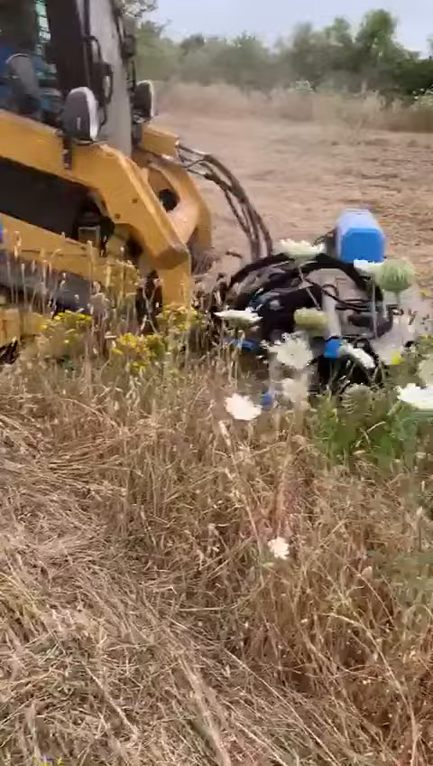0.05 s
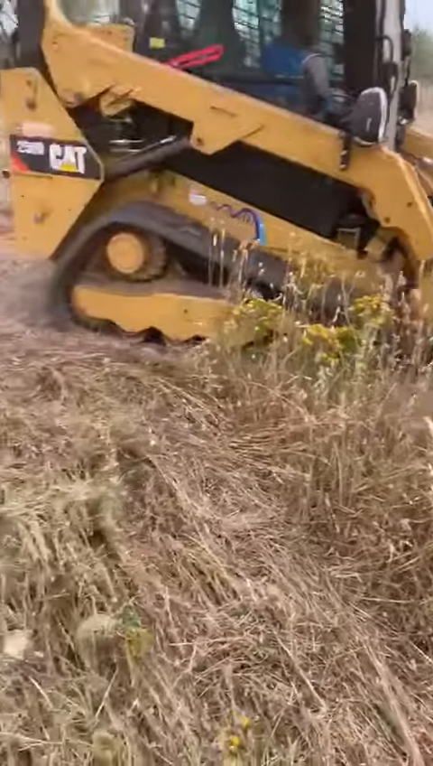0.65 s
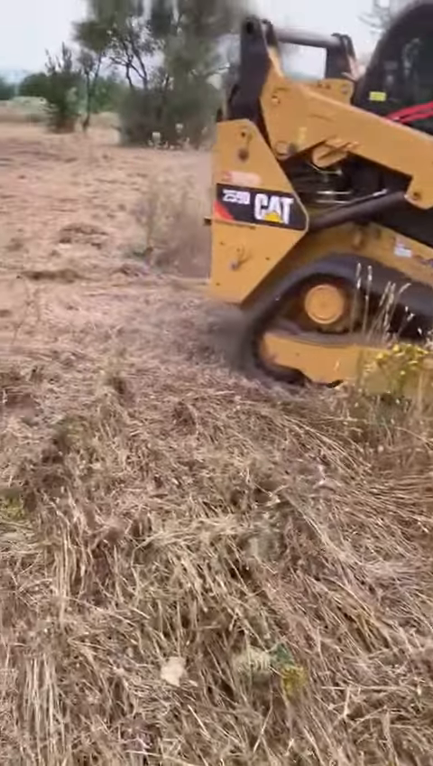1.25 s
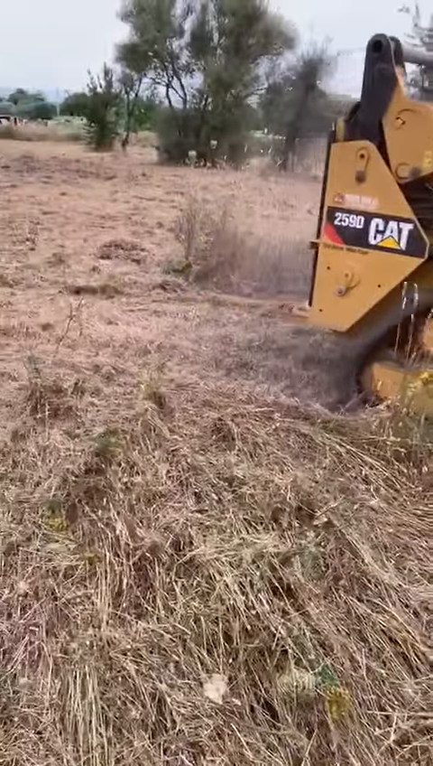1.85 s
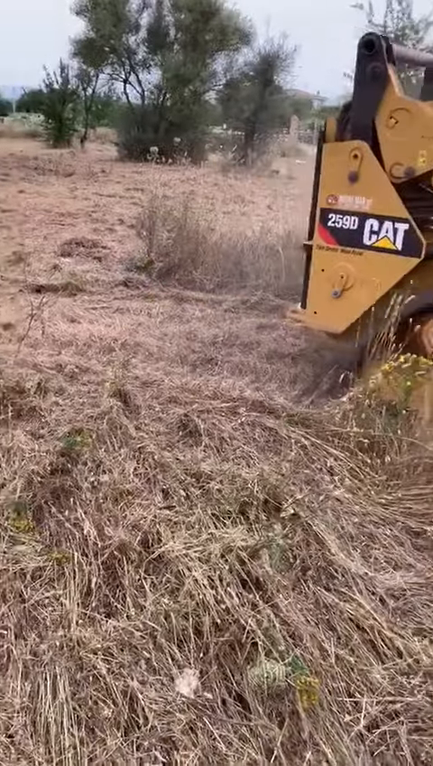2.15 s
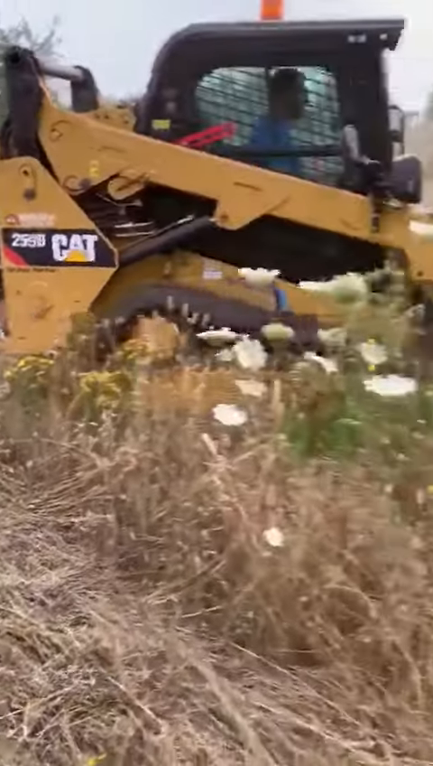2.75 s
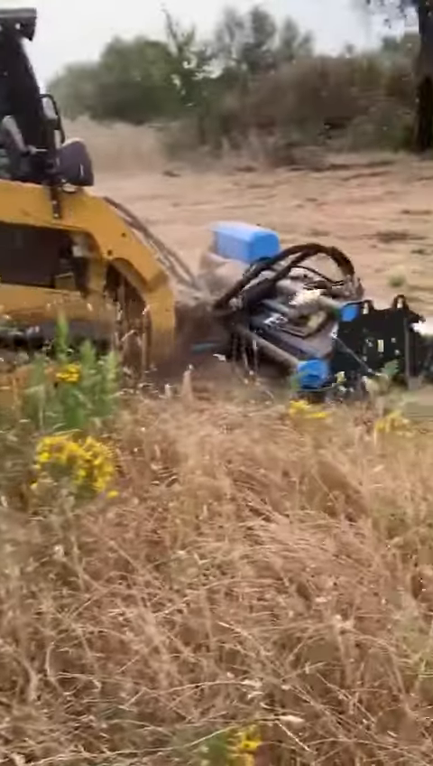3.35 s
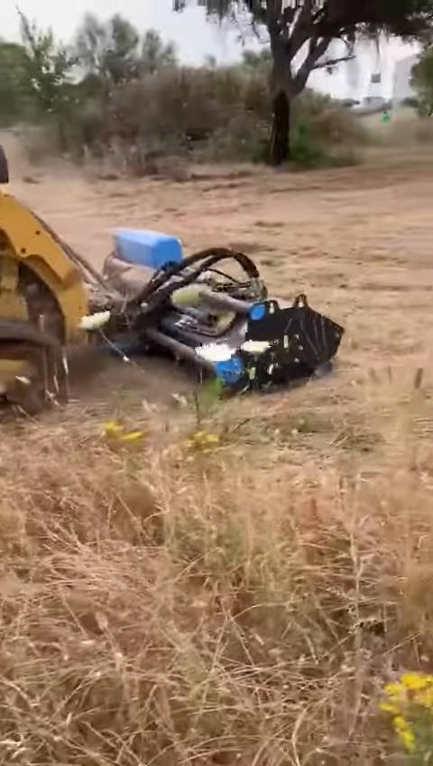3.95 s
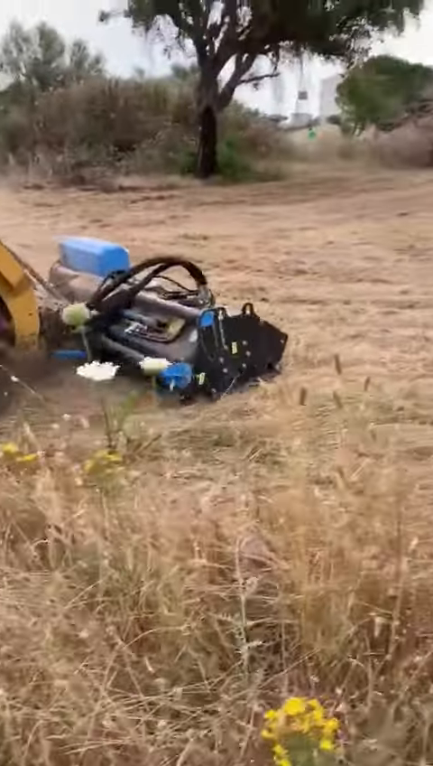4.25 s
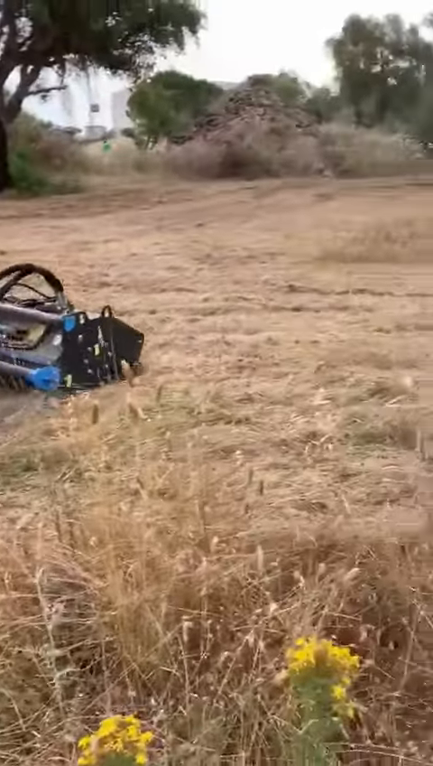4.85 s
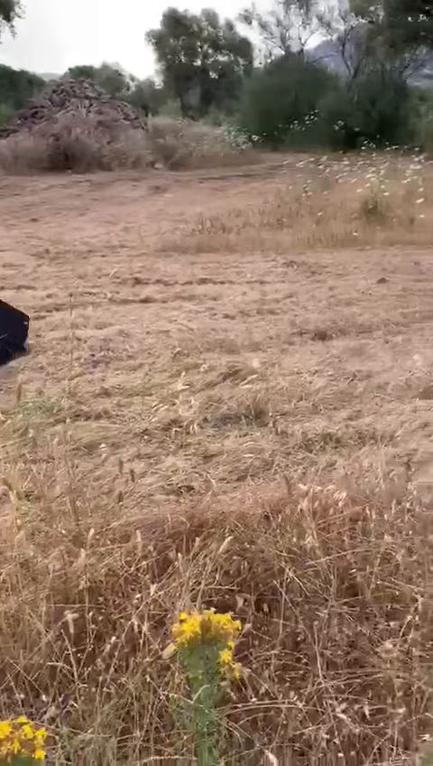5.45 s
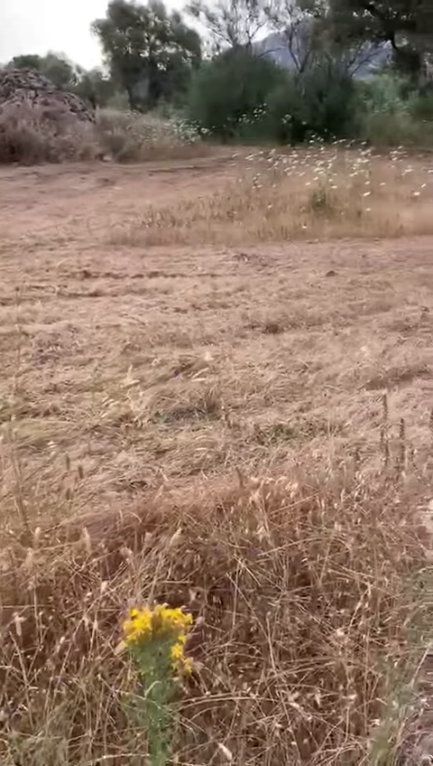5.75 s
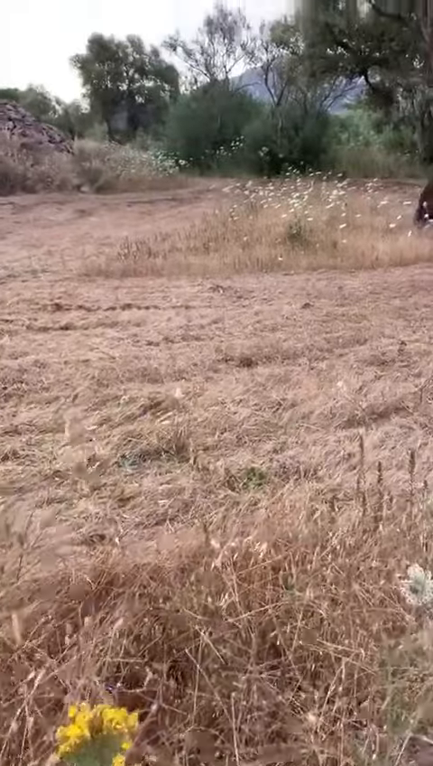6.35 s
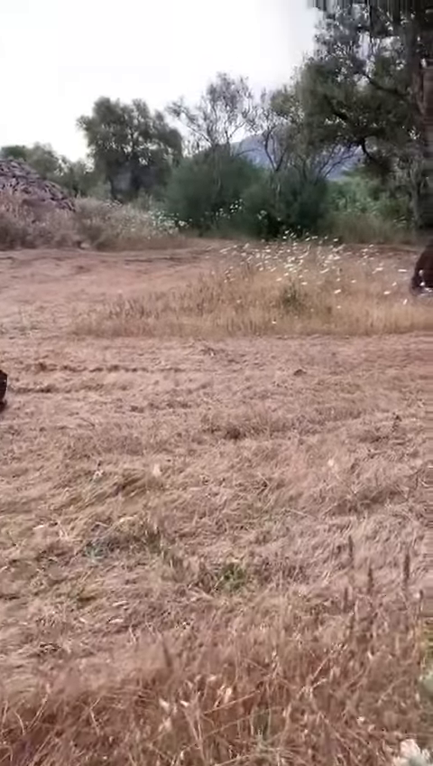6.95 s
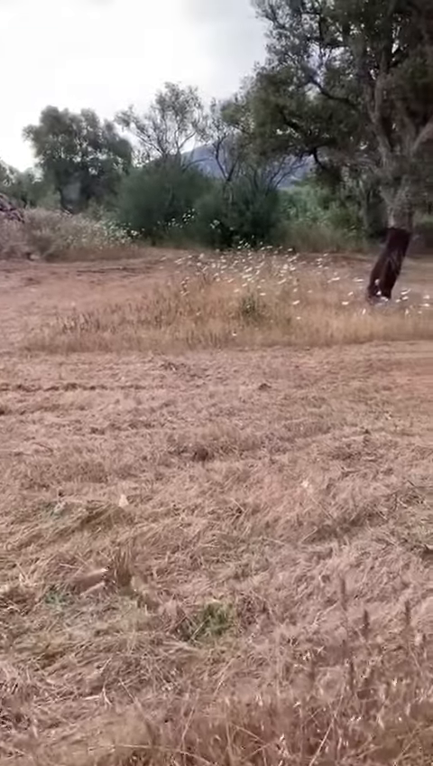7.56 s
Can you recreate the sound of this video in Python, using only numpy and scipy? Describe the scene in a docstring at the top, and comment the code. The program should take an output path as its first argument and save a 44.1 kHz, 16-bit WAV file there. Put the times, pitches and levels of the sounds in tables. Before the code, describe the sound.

A diesel tracked loader works a mulcher through dry grass a few metres away, outdoors. The engine hums and clatters at steady full throttle, with a singing fan tone that grows louder and a thin, wavering hydraulic whine. Stalks crackle as they are shredded, and stones ping and rattle in the steel hood. One hard clank comes before the middle, then louder clusters of strikes follow before the shredding eases and the engine runs on.

```python
"""A field of dry grass: a tracked diesel loader works a flail mulcher a few metres from a phone.
The engine hums and clatters at full throttle under a singing fan; track motors growl, hydraulics whine.
The rotor shreds stalks and flings stones, which ping on the flails and rattle round the steel hood.
The hardest blows make the phone's limiter duck."""
import sys
import numpy as np
from scipy import signal
from scipy.fft import rfft, irfft
from scipy.io import wavfile
from scipy.ndimage import uniform_filter1d, minimum_filter1d

SR = 44100
rng = np.random.default_rng(int(sys.argv[2]) if len(sys.argv) > 2 else 0)


def log_audio(samples):
    """Write samples as a 16-bit WAV file to the path given in sys.argv[1]."""
    # one column per channel
    frames = np.atleast_2d(samples).T
    # limit to full scale, then quantise
    limited = np.clip(frames, -1, 1)
    pcm = np.round(limited * 32767).astype(np.int16)
    wavfile.write(sys.argv[1], SR, pcm)


N = 334719
T = np.arange(N) / SR
BINS_HZ = np.arange(N // 2 + 1) * SR / N
CLOSEST_S = 4.9  # mulcher nearest the phone
STEEL_RISE_S = 0.0018

# track motors picking up speed: (time [s], length [s], pitch [Hz], level [dB])
TRACK_GROWLS = [(.35, .5, 107, -29), (4.328, 0.582, 109, -25), (6.549, 0.87, 171.3, -29.5)]
# hydraulics taking up load: (time [s], pitch [Hz], level [dB])
OIL_WHINE = [(0, 3175, -40.5), (1.15, 3197, -40), (1.6, 3195, -42), (1.9, 3215, -56), (2.05, 3250, -41),
             (2.42, 3232, -38), (2.52, 3220, -46), (2.7, 3210, -31), (2.9, 3200, -52), (3.41, 3235, -43),
             (3.47, 3250, -30.5), (3.6, 3270, -39), (3.88, 3290, -39), (4.02, 3265, -32), (4.18, 3260, -29),
             (4.47, 3277, -30.5), (4.66, 3295, -44), (4.86, 3295, -36), (5.2, 3240, -37), (5.37, 3245, -34),
             (5.6, 3307, -38.5), (6.2, 3200, -48), (7.1, 3217, -49), (7.59, 3220, -44)]
# oil valves and turbo: (pitch [Hz], start level [dB], end level [dB])
THIN_WHISTLES = [(2910, -47, -64), (8073, -50, -47)]
# relief valve: (time [s], length [s], pitch [Hz], glide [Hz/s], level [dB])
RELIEF_NOTES = [(5.37, 0.5, 4580, 213, -39), (6.56, 0.72, 4525, 227, -40)]
# pump overtones: (crank order [x], relative level [dB])
PUMP_ORDERS = [(17.95, 0), (26.97, -1)]
# pump, loudest with the flank facing the phone: (time [s], level [dB])
PUMP_CURVE = [(0, -50), (.9, -42), (2, -41.5), (3.3, -42.5), (4.6, -41), (5.5, -42), (6.2, -43),
              (7.59, -47)]
# fan, louder as the rear grille comes round: (time [s], level [dB])
FAN_CURVE = [(0, -34.5), (.4, -32.5), (.9, -30), (1.4, -26), (2.4, -23), (3.4, -22.5), (4.2, -18.8),
             (4.6, -21), (5.6, -20.7), (7.59, -20.8)]
# bay resonance, shifting as the loader turns: (time [s], pitch [Hz], level [dB])
BAY_BOOM = [(0, 240, -43), (1.4, 289.3, -37), (1.9, 285.3, -34), (2.5, 252.5, -30.5), (3.3, 245, -32),
            (4.25, 245, -27), (4.75, 254, -27.5), (5.4, 247.5, -31), (6.1, 265, -30.5), (6.7, 286.8, -33),
            (7.1, 256, -28), (7.59, 280.7, -32)]
# governed crank, sagging under load: (time [s], speed [Hz])
CRANK_SPEED = [(0, 40.84), (.8, 41.11), (1.9, 41.11), (2.4, 41.28), (2.8, 41.22), (3.3, 40.91),
               (3.9, 40.96), (4.25, 41.19), (4.75, 41.01), (5.6, 41.22), (6.1, 41.06), (7.05, 41.26),
               (7.59, 41.2)]
# engine, louder as its bay faces the phone: (time [s], base level [dB])
ENGINE_CURVE = [(0, -27), (1.25, -26), (2.3, -23.5), (3.85, -24), (4.3, -23), (5.5, -22), (6.2, -24.5),
                (7.59, -25)]
# engine overtones: (crank order [x], level re engine [dB])
ENGINE_ORDERS = [(3, -11.5), (3.5, -12.5), (6, -15.5)]
# exhaust swells and dips: (time [s], half length [s], note gain [dB], octave gain [dB])
EXHAUST_SURGES = [(1.9, 0.37, 1.5, 3), (2.486, 0.069, 0, 5.5), (2.668, 0.093, 6, -0.5),
                  (2.777, 0.045, -14, 2.5), (2.895, 0.068, 5.5, 3), (3.29, 0.19, 3.5, 2),
                  (3.78, 0.15, 2, -3), (4.7, 0.23, 0.5, -7), (5.675, 0.094, 3, -15), (6.103, 0.18, 0, 3),
                  (6.412, 0.065, 4.5, -11), (6.604, 0.068, -4, 2)]
# rotor, pump fundamental, drive motor: (pitch [Hz], start re engine [dB], end re engine [dB])
MACHINE_HUM = [(313.4, -12.5, -4), (369.4, -10.5, -26), (542, -10.5, -18)]
# thick tufts: (time [s], half length [s], shred base level [dB], clatter base level [dB])
GRASS_TUFTS = [(0.105, 0.057, -30, -32), (2.52, 0.38, -45, -34), (2.697, 0.22, -36.5, -30.5),
               (3, 0.17, -32.5, -30), (3.395, 0.6, -40.5, -44), (4.296, 0.29, -38, -49),
               (5.017, 0.13, -20.5, -19), (5.206, 0.09, -26.5, -59), (5.929, 0.1, -25, -38),
               (6.499, 0.32, -38.5, -36.5), (7.517, 0.11, -37, -48)]
# stones and clods: (time [s], spray base level [dB], knock base level [dB], t60 [s])
STONE_STRIKES = [(0.028, -24, -25, 0.087), (0.114, -27, -26, 0.14), (0.326, -27, -31, 0.38),
                 (0.947, -21, -24.5, 0.11), (1.133, -21.5, -28, 0.18), (1.212, -28, -26, 0.27),
                 (1.45, -29, -21.5, 0.27), (1.784, -19, -25.5, 0.19), (1.84, -14.5, -25, 0.092),
                 (1.939, -19, -20.5, 0.13), (2.089, -37, -25.5, 0.16), (2.58, -25.5, -33, 0.16),
                 (2.676, -11, -14.5, 0.17), (2.859, -30, -23, 0.033), (2.92, -25, -23, 0.07),
                 (2.937, -28, -29, 0.053), (2.974, -24, -28, 0.2), (3.032, -29, -20.5, 0.077),
                 (3.082, -24, -20, 0.065), (4.236, -23, -32, 0.15), (4.351, -20.5, -26.5, 0.12),
                 (4.883, -14, -15, 0.12), (4.907, -30, -13.5, 0.14), (4.94, 1.5, -5, 0.15),
                 (4.979, -26, -7, 0.12), (5.007, -8.5, -14, 0.13), (5.028, -6, -16, 0.1),
                 (5.094, -16, -8, 0.084), (5.372, -19, -22, 0.21), (5.675, -26.5, -24.5, 0.57),
                 (5.808, 2.5, -4, 0.12), (5.849, -40, -21, 0.48), (5.95, -21.5, -30, 0.27),
                 (6.021, -10.5, -24, 0.12), (6.23, -18.5, -50, 0.16), (6.412, -26.5, -32, 0.18),
                 (6.555, -25, -32, 0.35), (6.773, -29.5, -48, .18), (6.905, -25, -33, 0.23),
                 (7.268, -28.5, -36, 0.14), (7.304, -29, -27, .11)]
# big stones on steel: (time [s], pitch [Hz], level [dB], t60 [s])
STONE_CLANKS = [(2.683, 715, -10.5, 0.16), (2.685, 1270, -15.5, .13), (4.906, 2920, -7, .06),
                (4.94, 3210, -6, .05), (5.097, 2400, -6, 0.031), (5.102, 1287, -6, .06),
                (5.104, 904, -13, 0.075), (5.362, 1975, -20, 0.11), (5.812, 3230, -9, .1),
                (5.822, 1740, -12, .12), (5.832, 795, -10.5, 0.16), (5.885, 801, -18.5, 0.16)]
# pebbles on flails: (time [s], ring level [dB], crack level [dB], tuning [x])
PEBBLE_PINGS = [(0.947, -30, -12, 0.85), (1.135, -18.5, -18, 0.99), (1.214, -25, -29, 0.95),
                (1.789, -37, -22, .94), (1.844, -34, -16, 1.6), (1.943, -33, -21, 1.2),
                (2.091, -27, -38, .99), (2.684, -26, -11, 1.04), (5.812, -19, -7, 0.81),
                (5.953, -19, -24, .98), (6.023, -19, -9, 0.94)]
# modes of a flail and of the hood's steel: (frequency [Hz], relative level [dB])
FLAIL_RING = [(2830, -5), (3290, -4.5), (3850, -1.5), (6740, -4.5), (7250, -6)]
STEEL_RING = [(715, -2.5), (905, -2.5), (1030, -2), (1265, 0), (1370, 0.5), (1610, -2.5), (1760, -1.5),
              (1880, -2), (2220, -1), (2820, -3.5), (3030, -6), (3210, -5), (3380, -1.5), (3600, -1)]
# hood panel resonances: (frequency [Hz], width [Hz], peak re direct sound [dB])
PANEL_MODES = [(696, 140, 2), (2860, 45, -3), (3700, 820, -18.5), (6560, 450, -11.5)]
# noise spectra: (frequency [Hz], relative density [dB])
RUMBLE_SPECTRUM = [(20, -27), (30, -14), (50, -3), (110, -1), (190, -1.5), (250, 2.5), (295, 0.5),
                   (335, -5), (420, -5), (560, -4), (750, -20.5), (1200, -50), (3000, -68)]
CLATTER_SPECTRUM = [(300, 0), (650, 1.5), (1000, 1), (1500, -1), (2100, -3.5), (2500, -5), (3400, -12.5),
                    (5000, -11), (8000, -13.5), (12000, -21)]
SHRED_SPECTRUM = [(800, 3), (2000, 4), (3500, 8.5), (5000, 6), (7000, 4.5), (9500, 0), (12000, -7.5)]
STEM_SPECTRUM = [(400, -4), (1000, -3), (2000, -8), (3600, -0.5), (6000, -16), (12000, -37)]
SPRAY_SPECTRUM = [(900, -38), (2000, -3), (3300, -2.5), (4200, 4.5), (5500, 2), (7000, -3), (8500, -4.5),
                  (12000, -12)]
KNOCK_SPECTRUM = [(150, 3), (300, 8), (500, 12.5), (750, 2.5), (1300, 5.5), (1900, 4), (3000, 5),
                  (6000, -14.5)]
CRACK_SPECTRUM = [(500, -10), (1400, -1), (3400, 3), (6500, -1), (12000, -12)]
# stereo image: (frequency [Hz], left lead [rad], coherence [0-1])
STEREO_IMAGE = [(0, 0, 1), (220, 0, 1), (500, .6, .975), (860, 1.2, .82), (1400, .3, .75), (2000, .6, .65),
                (2600, 1.9, .35), (3000, .7, .6), (4000, 1.7, .65), (4350, np.pi, 1), (5330, np.pi, 1),
                (5760, 4.9, .55), (6350, 2 * np.pi, .995), (7500, 2 * np.pi, .995), (7800, 6.9, .6),
                (8600, 6.6, .8), (10200, 7.6, .35), (12000, 7.9, .6)]


def undb(db):
    """Decibels to gain."""
    return 10 ** (np.asarray(db) / 20)


def unit(x):
    """Scale to rms 1."""
    return x / np.sqrt(np.mean(x ** 2))


def curves(table):
    """Columns interpolated over time."""
    times_s, *columns = np.transpose(table)
    return [np.interp(T, times_s, column) for column in columns]


def colour(x, spectrum, band_hz):
    """Apply a spectrum; rms 1 inside the band."""
    hz, db = np.transpose(spectrum)
    shaped = rfft(x) * undb(np.interp(np.log(BINS_HZ + 1), np.log(hz), db))
    inside = shaped[..., (BINS_HZ > band_hz[0]) & (BINS_HZ < band_hz[1])]
    return irfft(shaped, N) * N / np.sqrt(2 * np.mean(np.sum(abs(inside) ** 2, axis=-1)))


def lowpass(x, hz):
    """Steep, zero phase."""
    return irfft(rfft(x) / (1 + (BINS_HZ / hz) ** 10), N)


def walk(rate_hz):
    """Smoothed random steps; rms 1."""
    hold = int(SR / rate_hz)
    steps = np.repeat(rng.standard_normal(N // hold + 1), hold)
    return unit(uniform_filter1d(uniform_filter1d(steps, hold), hold)[:N])


def turns(hz):
    """Cycles since the start."""
    return np.cumsum(hz) / SR


def tone(cycles, waver_db, drift_rad, rate_hz):
    """Sine with wandering level and phase; rms 1 before the waver."""
    gain = np.sqrt(2) * undb(waver_db * walk(rate_hz))
    return gain * np.sin(2 * np.pi * (cycles + rng.random()) + drift_rad * walk(rate_hz))


def grains(per_s, skew_db):
    """Dense stereo clicks of random size; rms 1."""
    size = undb(skew_db * np.minimum(rng.exponential(size=N), 5))
    return unit((rng.random(N) < per_s / SR) * size * rng.standard_normal((2, N)))


def throb(cycles, depth):
    """One swell per cycle."""
    return 1 + depth * np.cos(2 * np.pi * cycles)


def swell(s, half_s):
    """Gaussian envelope; peak 1."""
    return np.exp(-((T - s) / half_s) ** 2)


def gate(s, length_s, ramp_s):
    """Trapezoid envelope; peak 1."""
    return np.clip(np.minimum(T - s, s + length_s - T) / ramp_s + .5, 0, 1)


def dying(s, rise_s, t60_s):
    """Linear rise, exponential decay."""
    age_s = np.maximum(T - s, 0)
    return np.minimum(age_s / rise_s, 1) * np.exp(-np.log(1000) * np.minimum(age_s / t60_s, 2))


def tracks():
    """Track motors roll and growl; a roller squeaks once."""
    rolling = undb(-37) * tone(110 * T, waver_db=0.5, drift_rad=0.73, rate_hz=16)
    growl = 0
    for s, length_s, hz, db in TRACK_GROWLS:
        line = tone(hz * T, waver_db=0, drift_rad=0.81, rate_hz=16)
        growl += undb(db) * gate(s, length_s, ramp_s=0.087) * line
    squeak = undb(-24) * swell(4.09, half_s=0.014) * np.sin(2 * np.pi * 6900 * T)
    return rolling + growl + squeak


def hydraulics():
    """Oil whines under load, valves and turbo whistle, a relief valve sings twice."""
    whine_hz, whine_db = curves(OIL_WHINE)
    whine_gain = undb(whine_db + 1.3 * walk(16))
    sound = whine_gain * tone(turns(whine_hz), waver_db=1.8, drift_rad=.5, rate_hz=70)
    for hz, start_db, end_db in THIN_WHISTLES:
        db = np.linspace(start_db, end_db, N) + 2 * walk(3.62)
        sound += undb(db) * tone(hz * T, waver_db=1.8, drift_rad=.5, rate_hz=25)
    for s, length_s, hz, glide_hz_per_s, db in RELIEF_NOTES:
        line = tone(turns(hz + glide_hz_per_s * (T - s)), waver_db=1.5, drift_rad=.45, rate_hz=60)
        sound += undb(db) * gate(s, length_s, ramp_s=0.059) * line
    return sound


def pump(crank):
    """Nine pistons hum in two overtones geared to the crank."""
    pump_db, = curves(PUMP_CURVE)
    return sum(undb(pump_db + db) * tone(order * crank, waver_db=1.5, drift_rad=.4, rate_hz=12)
               for order, db in PUMP_ORDERS)


def fan(crank):
    """The cooling fan sings at 12 times crank speed."""
    fan_db, = curves(FAN_CURVE)
    return undb(fan_db) * tone(12 * crank, waver_db=.45, drift_rad=.05, rate_hz=25)


def bay_boom():
    """A narrow engine bay resonance swells and sinks several times a second."""
    hz, db = curves(BAY_BOOM)
    return undb(db) * unit(tone(turns(hz), waver_db=3.5, drift_rad=1.3, rate_hz=26))


def exhaust(crank, engine_db, share=0.49):
    """Four cylinders fire twice a turn; the note carries all round, so it follows the engine in part."""
    facing_db = share * (engine_db - np.mean(engine_db))
    note_db = -22 + facing_db + sum(db * swell(s, half_s) for s, half_s, db, _ in EXHAUST_SURGES)
    octave_db = -27 + facing_db + sum(db * swell(s, half_s) for s, half_s, _, db in EXHAUST_SURGES)
    note = undb(note_db) * tone(2 * crank, waver_db=0.5, drift_rad=0.081, rate_hz=8.2)
    octave = undb(octave_db) * tone(4 * crank, waver_db=2.6, drift_rad=0.3, rate_hz=16)
    return note + octave


def engine_overtones(crank, engine_db):
    """Weak, wavering lines locked to the crank."""
    return sum(undb(engine_db + db) * tone(order * crank, waver_db=4.5, drift_rad=0.59, rate_hz=7)
               for order, db in ENGINE_ORDERS)


def engine_noise(crank, engine_db, clatter_db):
    """Gas rumbles with each firing; metal clatters."""
    gas = rng.standard_normal((2, N)) * throb(2 * crank, depth=0.25)
    knocks = grains(per_s=9000, skew_db=-0.3) * throb(2 * crank, depth=0.022) * undb(1.87 * walk(28))
    rumble = colour(gas, RUMBLE_SPECTRUM, band_hz=(190, 450)) * undb(1.5 * walk(22))
    clatter = colour(knocks, CLATTER_SPECTRUM, band_hz=(650, 2000))
    return undb(engine_db - 2) * rumble + undb(clatter_db + 0.52) * clatter


def machine_hum(speed_ratio, engine_db):
    """Rotor, pump fundamental and drive motor lines, tracking engine speed."""
    hum = 0
    for hz, start_db, end_db in MACHINE_HUM:
        line = tone(turns(hz * speed_ratio), waver_db=-0.5, drift_rad=0.47, rate_hz=6)
        hum += undb(engine_db + np.linspace(start_db, end_db, N)) * line
    return hum


def workload(engine_db, shred_fade_db_per_s=4.5, clatter_fade_db_per_s=0.85):
    """Shred and clatter base levels [dB]: surging at each tuft, fading as the loader drives off."""
    approach_db = 7 * (swell(CLOSEST_S, half_s=1) - 1)
    leaving_s = np.maximum(T - CLOSEST_S, 0)
    grass_db = -32.5 + np.where(T < CLOSEST_S, approach_db, -shred_fade_db_per_s * leaving_s)
    metal_db = -32 + 0.64 * (engine_db - np.mean(engine_db)) - clatter_fade_db_per_s * leaving_s
    shred_power, clatter_power = undb(grass_db) ** 2, undb(metal_db) ** 2
    for s, half_s, shred_db, clatter_db in GRASS_TUFTS:
        shred_power += (undb(shred_db) * swell(s, half_s)) ** 2
        clatter_power += (undb(clatter_db) * swell(s, half_s)) ** 2
    return 10 * np.log10(shred_power), 10 * np.log10(clatter_power)


def shredding(rotor, shred_db):
    """Dry stalks snap under the flails in uneven bunches."""
    bunches = undb(1.3 * walk(14) + 1.1 * walk(45))
    snaps = grains(per_s=7000, skew_db=-0.5) * throb(rotor, depth=0.024) * bunches
    return undb(shred_db - 1.5) * colour(snaps, SHRED_SPECTRUM, band_hz=(5900, 11000))


def stems(shred_db, per_s=55, spread_db=3, t60_s=0.025):
    """Thick stems break in short, separate cracks."""
    cracks = (rng.random(N) < per_s / SR) * undb(spread_db * rng.standard_normal(N))
    power_decay = np.exp(-2 * np.log(1000) / (t60_s * SR))
    envelope = np.sqrt(signal.lfilter([1], [1, -power_decay], cracks ** 2))
    snaps = colour(envelope * rng.standard_normal((2, N)), STEM_SPECTRUM, band_hz=(1000, 4200))
    return undb(shred_db - 5) * snaps


def grit(count=60, per_s=5, spread_db=2.5, fade_db_per_s=0.5, t60_s=0.26):
    """Small stones picked up at random; rows as in STONE_STRIKES."""
    times_s = np.cumsum(rng.uniform(.2, 1.8, count)) / per_s
    sizes_db = spread_db * rng.standard_normal(count) - fade_db_per_s * np.maximum(times_s - CLOSEST_S, 0)
    return [(s, -31 + db, -36 + db, t60_s) for s, db in zip(times_s, sizes_db) if s < T[-1]]


def tumbling(clatter_db, per_s=70, spread_db=3, t60_s=.06):
    """Stones rattle round the hood; each blow wakes its own mix of steel modes."""
    knock_power = sum((undb(db) * dying(s, STEEL_RISE_S, knock_t60_s)) ** 2
                      for s, _, db, knock_t60_s in STONE_STRIKES)
    force = np.hypot(undb(clatter_db - 4.5), undb(-1) * np.sqrt(knock_power))
    blows = (rng.random(N) < per_s / SR) * undb(spread_db * rng.uniform(-0.75, 1, N))
    hits = np.flatnonzero(blows)
    rings = 0
    for hz, db in STEEL_RING:
        push = np.zeros((2, N))
        push[:, hits] = blows[hits] * rng.standard_normal((2, len(hits)))
        pole = np.exp((2j * np.pi * hz - np.log(1000) / t60_s) / SR)
        rings += undb(db) * signal.lfilter([1], [1, -pole], push).imag
    return force * unit(rings)


def pings(ring_t60_s=0.12, crack_t60_s=.025):
    """Pebbles crack against bare flails, each ringing at its own tuning."""
    rings, cracks = np.zeros(N), np.zeros(N)
    flutter_rad = [walk(220) for _ in FLAIL_RING]
    for s, ring_db, crack_db, tuning in PEBBLE_PINGS:
        on = (T > s) & (T < s + 2 * ring_t60_s)
        modes = sum(undb(db) * np.sin(2 * np.pi * hz * tuning * (T[on] - s) + phase[on])
                    for (hz, db), phase in zip(FLAIL_RING, flutter_rad))
        rings[on] += np.sqrt(2) * undb(ring_db) * dying(s, STEEL_RISE_S, ring_t60_s)[on] * modes
        cracks += undb(crack_db) * dying(s, STEEL_RISE_S / 2, crack_t60_s)
    return rings + cracks * colour(rng.standard_normal(N), CRACK_SPECTRUM, band_hz=(1000, 11000))


def clanks():
    """Big stones hit squarely; the steel rings, roughened by grass beating on it."""
    return sum(undb(db) * dying(s, STEEL_RISE_S, t60_s)
               * tone(hz * T, waver_db=2, drift_rad=.8, rate_hz=150)
               for s, hz, db, t60_s in STONE_CLANKS)


def hood_panels(x):
    """Each panel mode adds its ring to x."""
    resonance = sum(undb(db) / (1 + 1j * (BINS_HZ ** 2 - hz ** 2) / (width_hz * (BINS_HZ + 1)))
                    for hz, width_hz, db in PANEL_MODES)
    return irfft(rfft(x) * (1 + resonance), N)


def strikes(rise_s=0.0088):
    """Stones knock on the hood and burst into ricocheting fragments."""
    spray_power, knock_power = np.zeros(N), np.zeros(N)
    for s, spray_db, knock_db, t60_s in STONE_STRIKES + grit():
        burst = dying(s, rise_s, t60_s)
        spray_power += (undb(spray_db) * burst) ** 2
        knock_power += (undb(knock_db) * burst) ** 2
    fragments = grains(per_s=9000, skew_db=-4.8) * undb(0.43 * walk(160))
    blows = grains(per_s=9700, skew_db=-0.5) * undb(1.8 * walk(130))
    spray = np.sqrt(spray_power) * colour(fragments, SPRAY_SPECTRUM, band_hz=(2500, 11000))
    knock = np.sqrt(knock_power) * colour(blows, KNOCK_SPECTRUM, band_hz=(600, 2000))
    return hood_panels(undb(3.5) * spray + undb(-0.2) * knock)


def grass_shadow(mulcher, from_s=3.7, fade_db_per_s=2):
    """The top starts boosted, then dulls as the mulcher moves behind standing grass."""
    top_db = 7 - fade_db_per_s * np.maximum(T - from_s, 0)
    body = lowpass(mulcher, hz=8900)
    return body + undb(top_db) * (mulcher - body)


def stereo_image(tones, noise):
    """Left-right phase and noise coherence by frequency; opposite in phase around 5 kHz."""
    hz, lead_rad, coherence = np.transpose(STEREO_IMAGE)
    lag = np.exp(-1j * np.interp(BINS_HZ, hz, lead_rad))
    alike = np.interp(BINS_HZ, hz, coherence)
    right_noise = alike * rfft(noise[0]) + np.sqrt(1 - alike ** 2) * rfft(noise[1])
    right = irfft(lag * (rfft(tones) + right_noise), N)
    return np.array([tones + noise[0], right])


def centred(pair, until_s=3.24, below_hz=2000, share=0.88):
    """For the first three seconds, the sound below 2 kHz is nearly mono."""
    side = lowpass(pair[0] - pair[1], below_hz) / 2
    narrowing = share * np.clip((until_s - T) * 2 + .5, 0, 1)
    return pair - narrowing * side * np.array([[1], [-1]])


def limiter(x, ceiling_db=-10.5, above_hz=2200, window_s=0.014, lag_s=0.004):
    """Treble over the ceiling ducks everything; the first crack slips through."""
    treble = signal.sosfilt(signal.butter(2, above_hz, "high", fs=SR, output="sos"), x)
    window = int(window_s * SR)
    power = uniform_filter1d(np.mean(treble ** 2, axis=0), window)
    gain = undb(ceiling_db) / np.sqrt(np.maximum(power, undb(ceiling_db) ** 2))
    return x * np.interp(T - lag_s, T, uniform_filter1d(gain, window))


def scene(rotor_hz=39.2):
    """One engine speed drives crank, fan, pump and rotor."""
    crank_hz, = curves(CRANK_SPEED)
    engine_db, = curves(ENGINE_CURVE)
    shred_db, clatter_db = workload(engine_db)
    speed_ratio = crank_hz / np.mean(crank_hz)
    crank, rotor = turns(crank_hz), turns(rotor_hz * speed_ratio)
    tones = exhaust(crank, engine_db) + fan(crank) + engine_overtones(crank, engine_db) + pump(crank)
    tones += machine_hum(speed_ratio, engine_db) + hydraulics() + bay_boom() + tracks()
    tones += clanks() + pings()
    mulcher = shredding(rotor, shred_db) + stems(shred_db) + strikes() + tumbling(clatter_db)
    noise = engine_noise(crank, engine_db, clatter_db) + grass_shadow(mulcher)
    return centred(stereo_image(tones, noise))


def record(dry, peak=.92, cutoff_hz=11950):
    """The phone limits bursts, eases the gain round remaining peaks and cuts the top."""
    limited = limiter(dry)
    peak_gain = peak / np.maximum(np.max(abs(limited), axis=0), peak)
    eased = limited * uniform_filter1d(minimum_filter1d(peak_gain, size=128), size=128)
    return signal.sosfilt(signal.ellip(12, .2, 80, cutoff_hz, fs=SR, output="sos"), eased)


dry = scene()
out = record(dry)
log_audio(out)
```